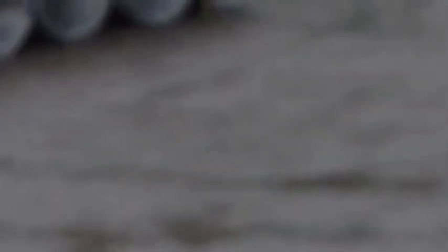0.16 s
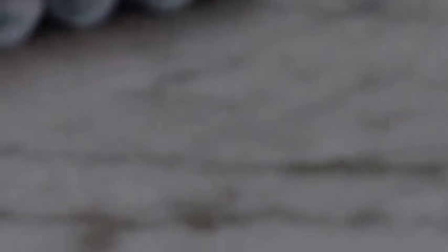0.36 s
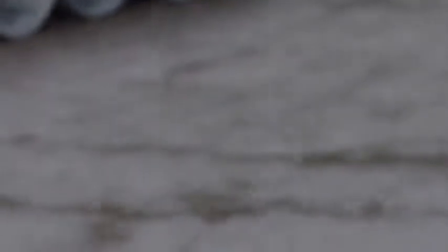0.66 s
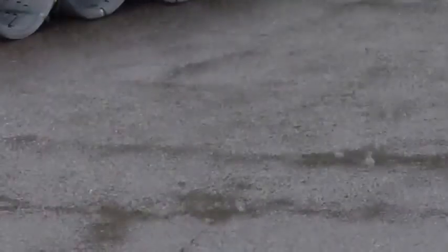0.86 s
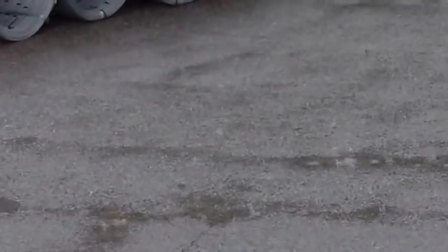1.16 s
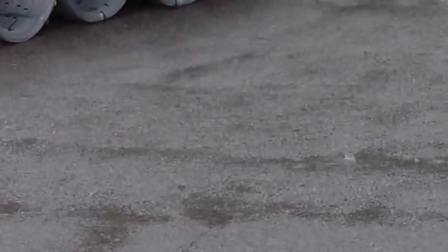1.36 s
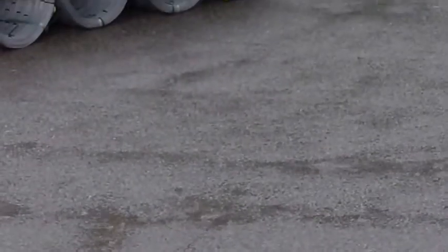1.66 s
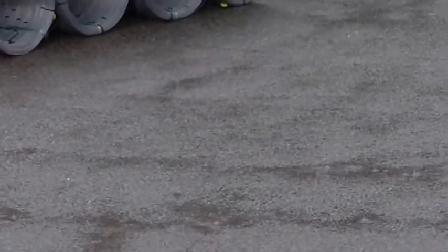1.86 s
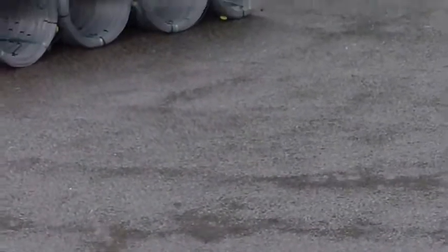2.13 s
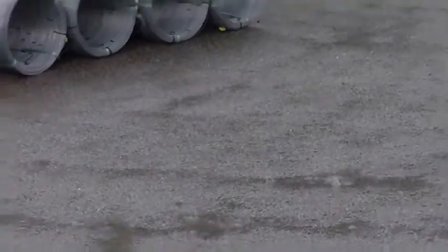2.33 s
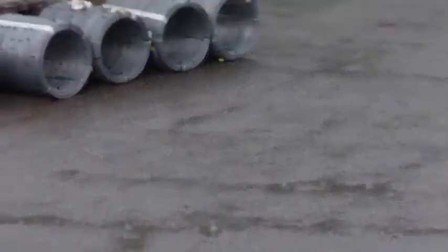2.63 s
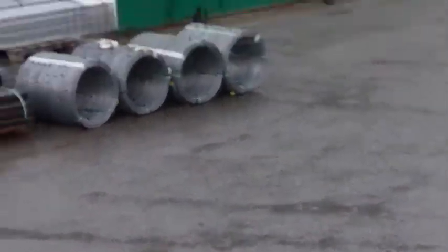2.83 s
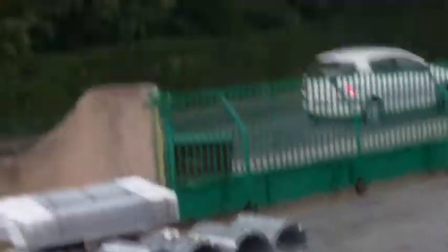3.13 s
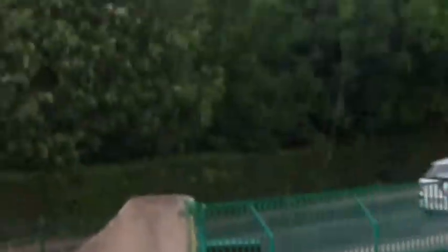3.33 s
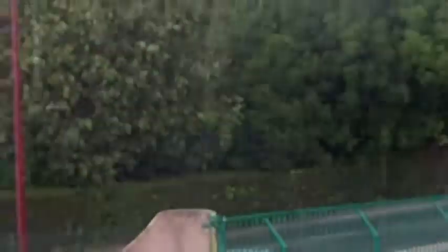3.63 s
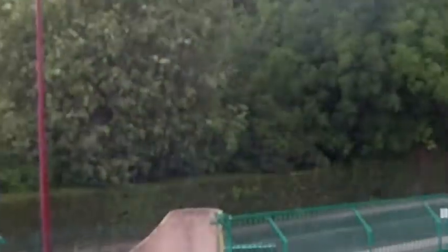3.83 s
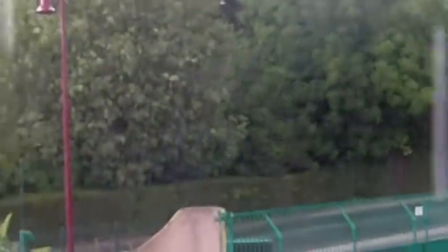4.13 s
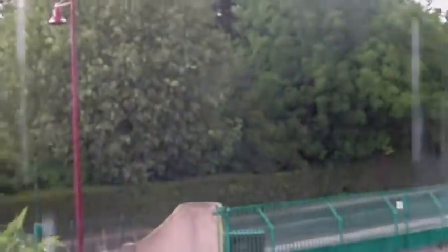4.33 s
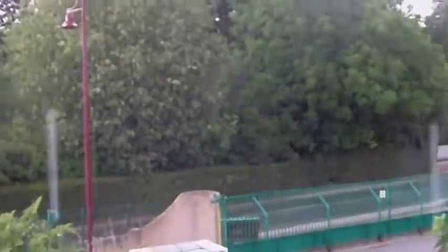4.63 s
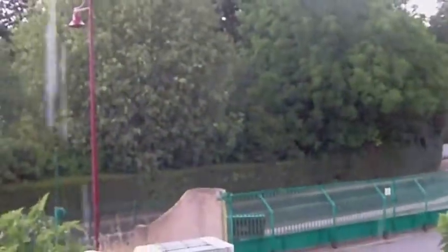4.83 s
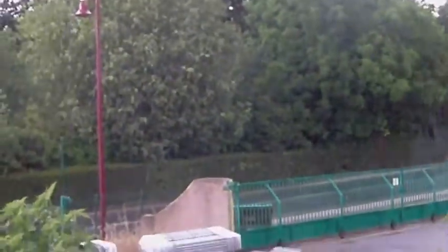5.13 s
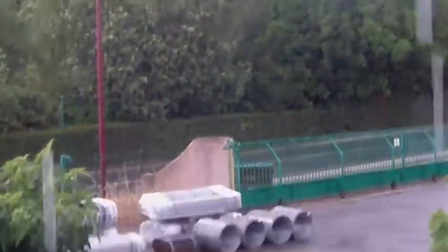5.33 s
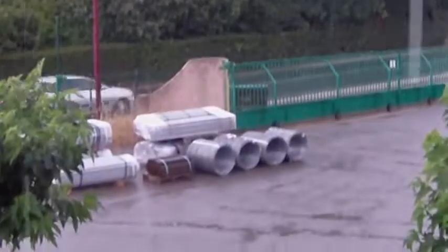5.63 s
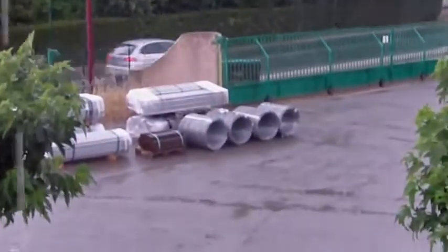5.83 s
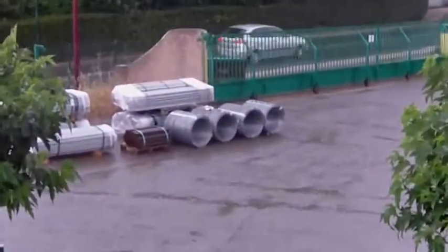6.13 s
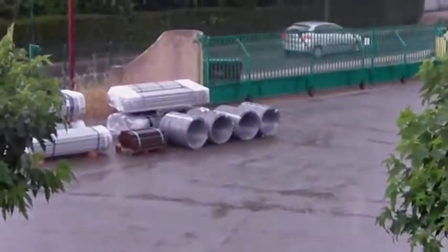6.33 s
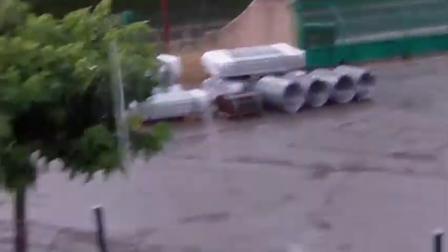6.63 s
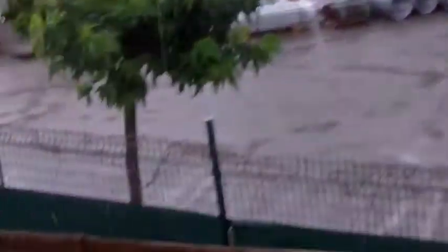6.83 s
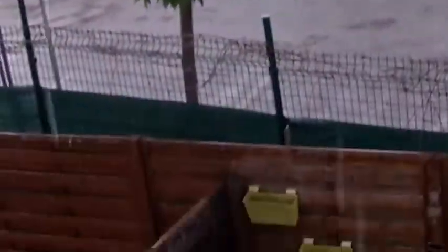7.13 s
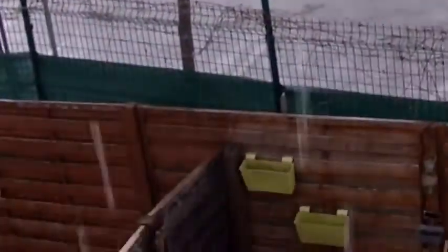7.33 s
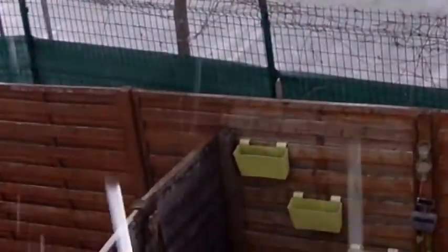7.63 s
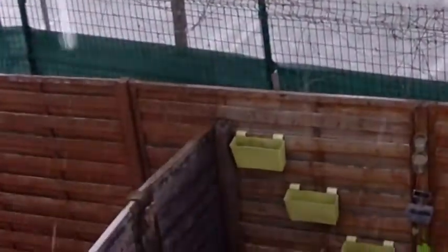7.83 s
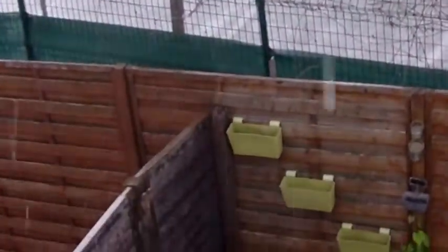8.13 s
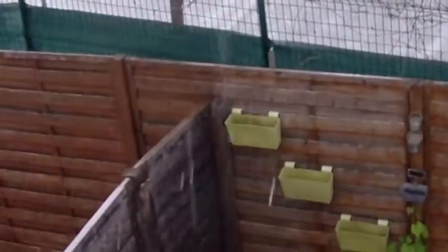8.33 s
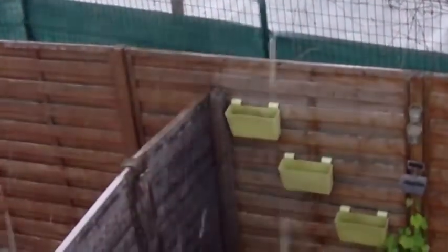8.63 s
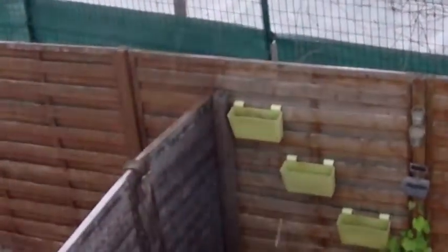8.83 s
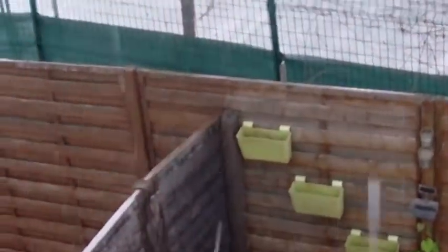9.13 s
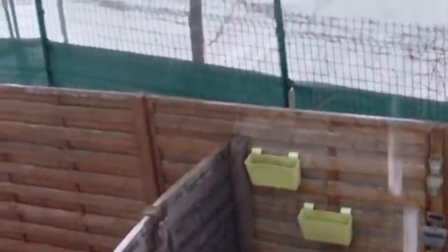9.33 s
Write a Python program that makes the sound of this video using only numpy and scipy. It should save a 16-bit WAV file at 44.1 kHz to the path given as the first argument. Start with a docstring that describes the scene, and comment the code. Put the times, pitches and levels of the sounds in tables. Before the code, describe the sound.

Dense, ringing hail clatters over a wash of distant rain, heard from a building above a paved yard. Gathered water splats on the ground, showers of stones drum on something hollow and cars pass faintly. The hail builds in waves to a peak just past halfway, when a bright fizz of nearby splashes opens up. A soft handling bump follows, and the hail dulls briefly before rattling on.

```python
"""Heavy rain and hail on a car park, heard from a building above it.
From the start, countless ringing hailstones clatter over a wash of far rain. Gathered water splats,
showers of stones drum on something hollow and cars pass faintly. The hail builds in waves to a peak
at 5.5 s, as the microphone swings to the yard and the fizz of near splashes comes into the open.
Near 6.6 s it points down with a soft handling bump, briefly dulling the hail, which rattles on."""
import sys
import numpy as np
from scipy import signal
from scipy.fft import rfft, irfft
from scipy.io import wavfile
from scipy.ndimage import map_coordinates

SR = 44100
rng = np.random.default_rng(int(sys.argv[2]) if len(sys.argv) > 2 else 0)


def digitize_waveform(pressure):
    """Quantize a signal to 16-bit integers and store it at the path in sys.argv[1].

    Rows of a 2-D input are taken as channels; values are limited to [-1, 1].
    """
    field = np.atleast_2d(pressure).T
    bounded = np.clip(field, -1, 1)
    quanta = np.round(bounded * 32767).astype(np.int16)
    wavfile.write(sys.argv[1], SR, quanta)


N = 417627
TIME = np.arange(N) / SR
FRAME_HZ = np.fft.rfftfreq(512, 1 / SR)[:, None]

# the waves of hail: t/s, level/dB
HAIL_WAVES = [(0, -3.5), (.5, -1), (2.35, -1.3), (3.3, 1.2), (3.7, 0.5), (4.4, 3.5), (4.75, 3), (5.5, 4.5),
              (5.62, 0.5), (6.08, -3), (6.28, 2.4), (6.66, -3.8), (6.82, 0.5), (7.02, -1.9), (7.3, 1.5),
              (7.65, -1.4), (8.05, 1), (9.0, -3)]
# the ring of a hailstone: f/Hz, width/Hz, level/dB
STONE_MODES = [(1660, 500, -61.9), (2060, 430, -57.7), (3180, 1036, -62.8), (3965, 810, -49.8),
               (5090, 600, -57.4), (6112, 1389, -73.6)]
# accents from the heaviest stones: t/s, relative level/dB, f/Hz
HEAVY_STONES = [(1.428, -7, 3980), (2.456, -5, 3900), (2.468, -8, 3900), (2.901, -6, 4000),
                (3.187, -8, 2050), (4.147, -9, 2050), (4.280, -8, 2050), (4.294, -6, 3980),
                (5.161, -7, 3980), (5.679, -8, 4050), (7.537, -7, 3950), (7.774, -7, 3950)]
# showers of stones on something hollow: middle t/s, length/s, level/dB
DRUM_SHOWERS = [(1.35, .6, -2), (4.33, .75, 4.5), (5.4, .5, 1), (7.98, 0.42, 0), (9.47, .16, 1)]
# the hollow body they strike: f/Hz, width/Hz, level/dB
HOLLOW_MODES = [(1280, 230, -54.5), (1720, 330, -57), (2070, 220, -54)]
# tone of the far rain: f/Hz, level/dB
WASH_EQ = [(40.0, -82), (110.0, -69), (300.0, -80), (420.0, -64), (530.0, -65), (610.0, -71), (780.0, -57),
           (1250.0, -57.5), (2600.0, -63), (3300.0, -60), (5600.0, -95), (7000.0, -89), (12500.0, -88),
           (15000.0, -101.4)]
# tone of the near splashes: f/Hz, level/dB
FIZZ_EQ = [(2500.0, -87), (5500.0, -65.5), (7200.0, -65.5), (8400.0, -64.5), (10300.0, -70.5),
           (11700.0, -77), (12600.0, -78), (13600.0, -83), (15200.0, -86.5)]
# gathered water hitting the ground: t/s, level/dB
WATER_SPLATS = [(.87, -10), (2.06, -6), (2.456, -2), (3.182, -2), (3.91, 1.5), (5.26, 0.5), (5.5, 4),
                (6.245, 0), (6.79, -2)]
# tone of its spray: f/Hz, level/dB
SPRAY_EQ = [(1500, -80), (3000, -53), (4200, -53.5), (6500, -64.5), (9000, -78), (15000, -90)]
# tiny bright clicks and ticks close to the microphone: t/s, level/dB, f/Hz, width/Hz
CLOSE_TICKS = [(1.355, -25, 12000, 7000), (2.423, -21, 12000, 7000), (2.990, -25, 12000, 7000),
               (4.124, -16, 12000, 7000), (4.187, -18, 10500, 2500), (5.267, -22, 10000, 3000),
               (5.595, -16, 8900, 900), (5.744, -13, 9700, 1500)]
# the microphone's housing: f/Hz, t60/s, relative level/dB
HOUSING_MODES = [(170, 0.05, -3), (302, 0.04, -1.5), (400, 0.049, -1.5), (574, 0.048, -5)]
# cars on the road: middle t/s, length/s, tone f/Hz, tone level/dB, rumble level/dB
PASSING_CARS = [(1.93, .9, 107.7, -46, -50), (1.9, .9, 161.5, -48, -53), (3.7, 0.66, 110, -50, -58),
                (5.16, 2, 279.9, -54.5, -47.5)]
# reflections off the window frame and walls: delay/s, level/dB
REFLECTIONS = [(.0021, -27), (.0034, -21), (.0052, -21)]
# the microphone's swing: t/s, amount of turned EQ, amount of lowered EQ
MIC_MOVES = [(5.3, 0, 0), (5.8, 0.45, 0.18), (6.2, 0.7, 0), (6.55, 0, 0.8), (6.85, -0.089, 0.75),
             (7.25, -0.28, 0)]
# its tone in those two positions: f/Hz, turned level/dB, lowered level/dB
MIC_EQ = [(1800, 1, 0), (2050, -4.5, -9), (2260, 5.5, 2), (2480, -1, 0), (3300, 2, -1), (3770, -1, 5.5),
          (4200, 0.5, -4.5), (4860, -4.5, -5.5), (5480, 2, 5.5), (6000, 1, -5.5), (7150, 7, 3),
          (8450, -3.5, -4), (9900, -4, 2.5), (14000, -0.5, 5)]

DULL_TILT, LOWERED_TILT = -4, -7.5  # dB per octave
HARD_FROM_DB, TILT_PER_HARD_DB, SPLASH_PER_HARD_DB = 1.2, 1.57, 1.7  # hard hail: brighter, more fizz
OPEN_AT_S, OPENING_S = 5.52, 0.15  # the splashes are shielded until the swing to the yard
SHIELDED_DB, OPEN_DB, SPLASH_FOLLOW = -17.2, -1.84, 0.37


def hail():
    """The clatter: each stone rings the same short modes, in its own proportions."""
    stones, clatter = impacts(per_s=1000, spread_db=2.0), np.zeros(N)
    for hz, width, db in STONE_MODES:
        blows = patter(evened(stones * rng.uniform(-1, 1, N)), share=.3)
        clatter += coloured(blows, lambda t: resonance(hz, width, db))
    octaves = np.log2(np.maximum(FRAME_HZ, 2000) / 4000)  # the tilt pivots at 4 kHz
    return coloured(clatter, lambda t: gain_of(brightness(t) * octaves))


def hardness(t):
    """How many dB the hail is above the point where it starts to fall hard."""
    return np.maximum(curves(HAIL_WAVES, t)[0] - HARD_FROM_DB, 0)


def brightness(t):
    """The hail's tilt in dB per octave: harder hail is brighter, a lowered microphone duller."""
    lowered = curves(MIC_MOVES, t)[1]
    return DULL_TILT + TILT_PER_HARD_DB * hardness(t) + LOWERED_TILT * lowered


def large_stones(sharpness=7):
    """The heaviest stones cut through with one mode; the lower it is, the longer it rings."""
    return gain_of(-4) * pings([(s, db, hz, hz / sharpness) for s, db, hz in HEAVY_STONES])


def drumming():
    """Each shower of stones swells and fades as a cluster of hollow knocks."""
    showers = sum(gain_of(db) * swell(s, length) for s, length, db in DRUM_SHOWERS)
    body = sum(resonance(hz, width, db) for hz, width, db in HOLLOW_MODES)
    knocks = patter(impacts(per_s=120, spread_db=2.0), share=.6)
    return coloured(showers * knocks, lambda t: body)


def far_rain():
    """The bed: drops all over the car park merge into a wash."""
    drops = patter(impacts(per_s=1800, spread_db=3.5), share=0.31)
    return coloured(drops, lambda t: gain_of(spectrum(WASH_EQ)))


def splashes():
    """Near drops burst on wet ground in a fine fizz; some ring briefly at a pitch of their own."""
    drops, rings = patter(impacts(per_s=1800, spread_db=1), share=0.29), np.zeros(N)
    for hz in np.linspace(5000, 15000, num=12):
        resonator = signal.iirpeak(hz, hz / 900, fs=SR)
        rings += signal.lfilter(*resonator, impacts(per_s=80, spread_db=1.0))
    fizz = np.sqrt(SR / 2) * evened(evened(drops) + gain_of(-9) * evened(rings))
    return coloured(fizz, lambda t: gain_of(spectrum(FIZZ_EQ)))


def splats(decay_s, attack_s=0.0023):
    """Gathered water lands, and each splat throws a fast-fading spray of droplets."""
    t, envelope = np.arange(SR // 2) / SR, np.zeros(N)
    for s, db in WATER_SPLATS:
        add(envelope, s, gain_of(db) * np.exp(-t / decay_s) * (1 - np.exp(-t / attack_s)))
    droplets = patter(impacts(per_s=2000, spread_db=3.0), share=0.41)
    return coloured(envelope * droplets, lambda t: gain_of(spectrum(SPRAY_EQ)))


def near_drops(level_db, low_hz, high_hz):
    """Stray drops tick close by, each a tiny burst of bright noise."""
    band = signal.butter(4, [low_hz, high_hz], "band", fs=SR)
    burst = rng.standard_normal(300) * np.exp(-np.arange(300) / 70)
    ticks = signal.oaconvolve(impacts(per_s=14, spread_db=1.9), burst)[:N]
    return gain_of(level_db) * evened(signal.lfilter(*band, ticks))


def bump(at_s, level_db, attack_s=0.0033):
    """A hand nudges the housing: a few dull modes with a soft attack."""
    t, out = np.arange(SR // 5) / SR, np.zeros(N)
    knock = sum(gain_of(db - 60 * t / t60) * np.sin(2 * np.pi * hz * t) for hz, t60, db in HOUSING_MODES)
    add(out, at_s, gain_of(level_db) * knock * (1 - np.exp(-t / attack_s)))
    return out


def engines():
    """Wavering engine tones and a low rumble swell and fade behind the rain."""
    out = np.zeros(N)
    for s, length, hz, tone_db, rumble_db in PASSING_CARS:
        pitch_hz = hz * (1 + 0.015 * wander(1, 25))
        tone = np.sin(2 * np.pi * np.cumsum(pitch_hz) / SR)
        out += swell(s, length) * (gain_of(tone_db) * tone + gain_of(rumble_db) * wander(74, 280))
    return out


def walls(x):
    """Early reflections comb the sound; their paths drift as the hand moves."""
    out = x.copy()
    for delay, db in REFLECTIONS:
        lag_s = delay * (1 + .05 * wander(.05, .6))
        out += gain_of(db) * map_coordinates(x, [(TIME - lag_s) * SR], order=3)
    return out


def swing(t):
    """The moving EQ of the microphone as it turns, then points down."""
    turned, lowered = curves(MIC_MOVES, t)
    hz, turned_db, lowered_db = np.transpose(MIC_EQ)
    return gain_of(turned * spectrum(np.c_[hz, turned_db]) + lowered * spectrum(np.c_[hz, lowered_db]))


def impacts(per_s, spread_db):
    """Random clicks, many small and a few large."""
    size = gain_of(spread_db * np.minimum(rng.exponential(1, N), 4))
    return evened(size * rng.choice([-1, 1], N) * (rng.random(N) < per_s / SR))


def patter(clicks, share):
    """Distinct clicks take this share of the power, a blur of noise the rest; 0 dB per Hz."""
    return np.sqrt(SR / 2) * (np.sqrt(share) * clicks + np.sqrt(1 - share) * rng.standard_normal(N))


def pings(rows):
    """One short ring for each row: t/s, level/dB, f/Hz, width/Hz."""
    t, out = np.arange(SR // 50) / SR, np.zeros(N)
    for s, db, hz, width in rows:
        age = np.pi * width * t  # the ring peaks at age 1
        add(out, s, gain_of(db) * age * np.exp(1 - age) * np.sin(2 * np.pi * hz * t))
    return out


def resonance(hz, width, db):
    """The frequency response of one damped mode."""
    return gain_of(db) / (1 + 2j * (FRAME_HZ - hz) / width) ** 2


def swell(middle_s, length_s):
    """A fade in and out, shaped as one cosine arch."""
    return np.cos(np.pi * np.clip((TIME - middle_s) / length_s, -.5, .5))


def wander(slow_hz, fast_hz):
    """Random drift of rms 1, stronger at the slow end."""
    hz = np.fft.rfftfreq(N, 1 / SR)
    band = (hz > slow_hz) * (hz < fast_hz)
    return evened(irfft(rfft(rng.standard_normal(N)) * band / np.sqrt(hz + 1), N))


def coloured(x, response):
    """Filters x by response(frame times), a gain for each frequency and moment."""
    _, t, frames = signal.stft(x, SR, nperseg=512, noverlap=384)
    return signal.istft(frames * response(t), SR, nperseg=512, noverlap=384)[1][:N]


def notched(x, hz, width_hz, passes):
    """Cuts a band out of x; each pass carves out more."""
    for _ in range(passes):
        x = signal.lfilter(*signal.iirnotch(hz, hz / width_hz, fs=SR), x)
    return x


def spectrum(points):
    """An EQ curve through f/Hz, level/dB points on a log-frequency axis."""
    hz, db = np.transpose(points)
    return np.interp(np.log(FRAME_HZ + 1), np.log(hz), db)


def curves(rows, t):
    """Automation: the columns after t/s, read at the times t."""
    s, *columns = np.transpose(rows)
    return [np.interp(t, s, c) for c in columns]


def add(mix, s, sound):
    """Mixes a sound in at s seconds."""
    part = mix[round(s * SR):][:len(sound)]
    part += sound[:len(part)]


def gain_of(db):
    """Decibels to a factor."""
    return 10 ** (np.asarray(db) / 20)


def evened(x):
    """Scaled to rms 1."""
    return x / np.sqrt(np.mean(x ** 2) + 1e-20)


def scene():
    """The mix: over a gently swelling rain bed, hail and splashes ride the same waves and flurries."""
    hail_db = curves(HAIL_WAVES, TIME)[0]
    opened = np.clip((TIME - OPEN_AT_S) / OPENING_S + .5, 0, 1)
    splash_db = SHIELDED_DB + (OPEN_DB - SHIELDED_DB) * opened
    splash_db += SPLASH_FOLLOW * hail_db + SPLASH_PER_HARD_DB * hardness(TIME)
    flurry = wander(3, 40)
    out = far_rain() * gain_of(-0.29 + 0.8 * wander(.3, 1.4) + 0.17 * flurry)
    out += hail() * gain_of(hail_db - 0.27 + 0.43 * flurry)
    out += splashes() * gain_of(splash_db + 0.88 * flurry)
    out += large_stones() + drumming()
    out += splats(decay_s=.035) + near_drops(level_db=-54.5, low_hz=5500, high_hz=11000)
    out = coloured(walls(out), swing)
    return (out + pings(CLOSE_TICKS) + engines() + bump(at_s=6.576, level_db=-15.5))[None]


def record(dry, low_cut_hz=411, high_cut_hz=15330):
    """A small microphone: thin bass, two dead spots and a steep high cut."""
    x = signal.lfilter(*signal.butter(2, low_cut_hz, "high", fs=SR), dry)
    x = notched(x, hz=1008, width_hz=830, passes=1)
    x = notched(x, hz=7842, width_hz=340, passes=2)
    high_cut = signal.firwin(1023, high_cut_hz, window=("kaiser", 9), fs=SR)
    return signal.oaconvolve(x, high_cut[None], "same")


dry = scene()
out = record(dry)
digitize_waveform(out)
```